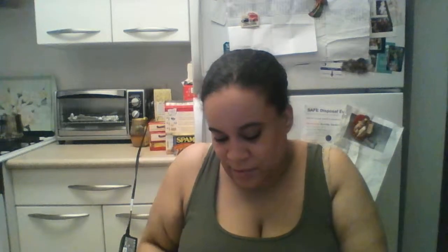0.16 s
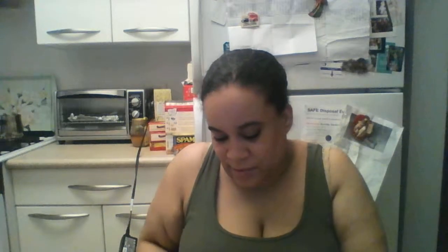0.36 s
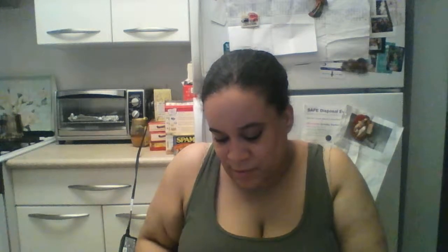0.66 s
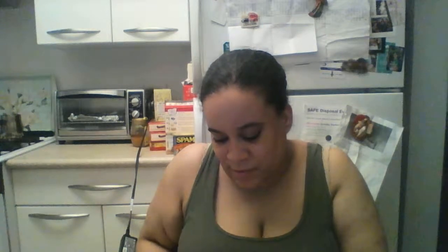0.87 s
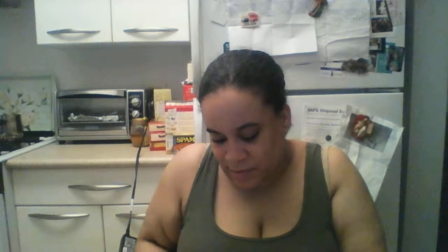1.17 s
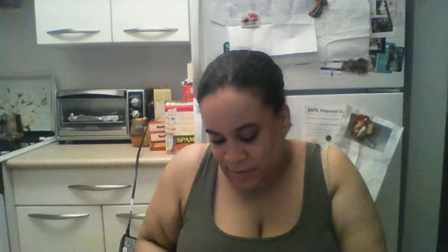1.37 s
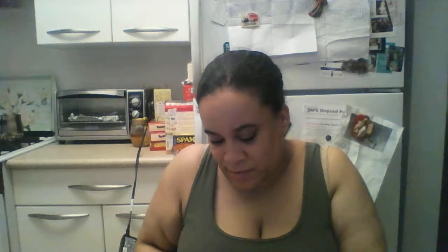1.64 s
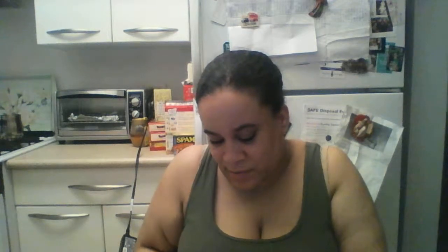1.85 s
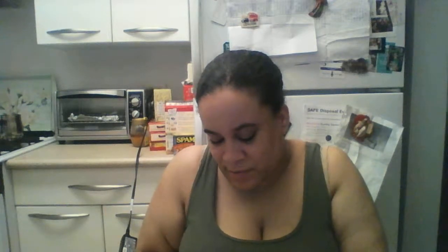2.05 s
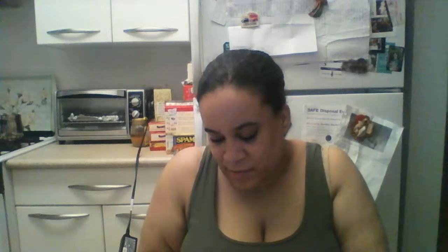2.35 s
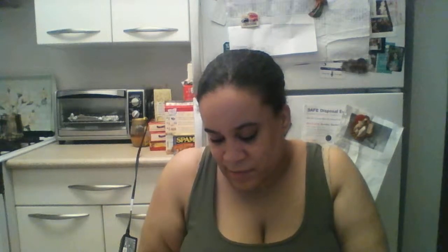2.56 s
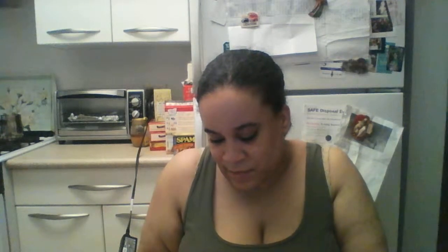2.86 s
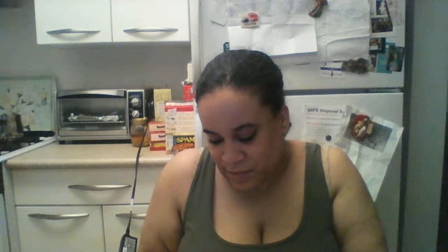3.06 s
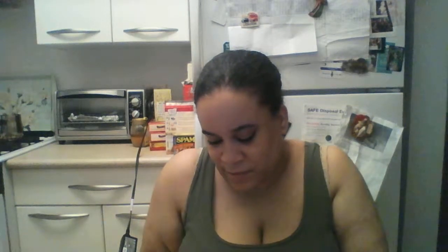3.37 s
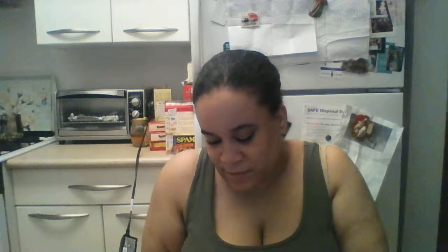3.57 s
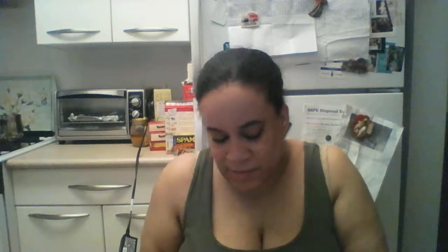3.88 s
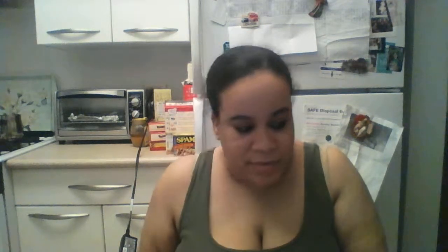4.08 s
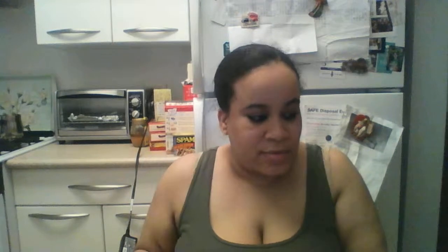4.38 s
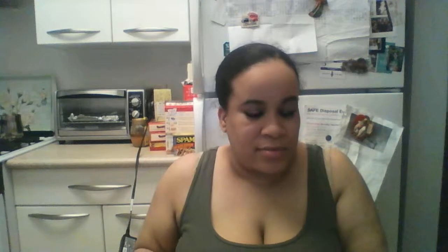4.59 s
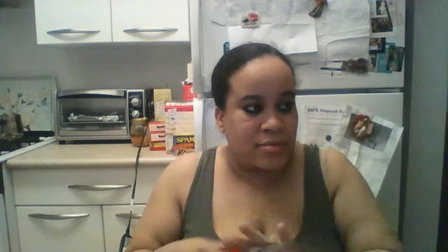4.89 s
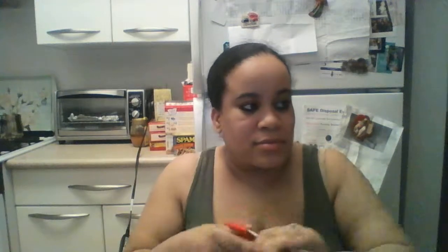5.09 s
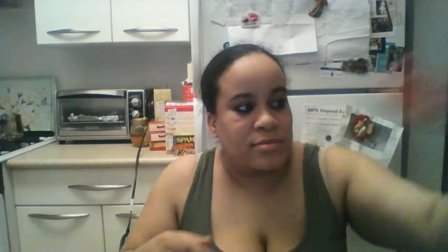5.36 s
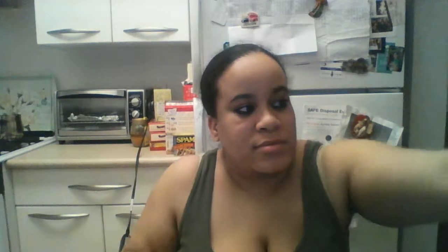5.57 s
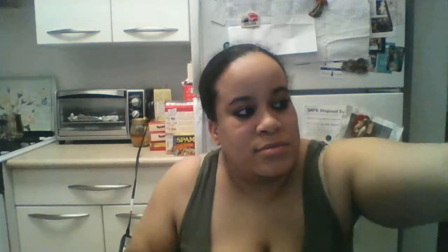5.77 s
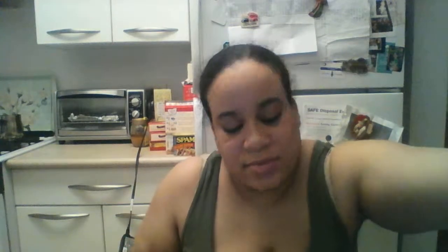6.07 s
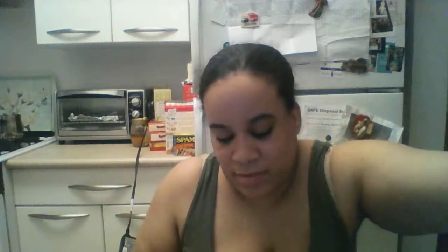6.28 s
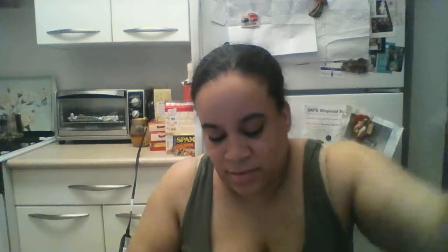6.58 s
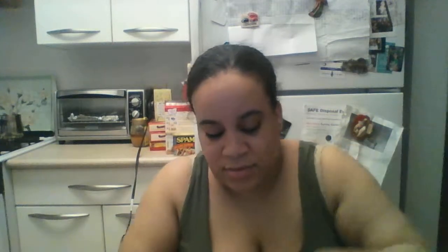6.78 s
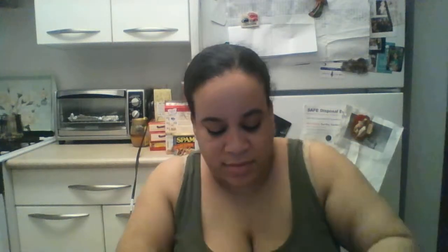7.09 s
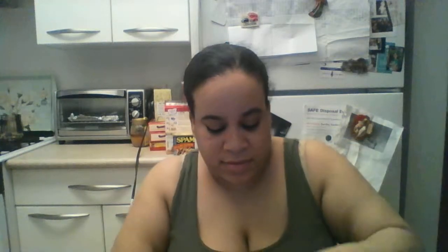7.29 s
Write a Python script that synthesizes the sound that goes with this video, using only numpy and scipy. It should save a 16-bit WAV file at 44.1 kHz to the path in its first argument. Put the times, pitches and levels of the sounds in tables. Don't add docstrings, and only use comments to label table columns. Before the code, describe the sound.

A small, hard-surfaced kitchen with a faint, steady appliance whir, heard through a narrow-band laptop microphone. From 0 to 1.3 s hands lightly rub cardboard, with a small knock and snap near 0.5 s. At 1.45 s a sharp double snap and short slice jump out, followed by soft papery scraping that swells around 2.0-2.2 s. Light hollow knocks come at 2.5-2.9 s, and a bright metallic scissor tick at 3.0 s. At 3.5 s a raspy slice and thud lead into the loudest crack at 3.65 s, with hard cutting and low table bumps. More slices, pulls and flap snaps run from 3.9 to 4.5 s, then it fades to near stillness. From 5.9 s there are table thumps, crackling tape and light scrapes; at 6.75 s a strong flap snap, then dense pops, rubbing and hollow knocks from 6.9 s to the end, about 7.4 s.

```python
import sys
import numpy as np
from scipy import signal
from scipy.fft import rfft, irfft, next_fast_len
from scipy.io import wavfile
from scipy.ndimage import uniform_filter1d

SR = 44100
rng = np.random.default_rng(int(sys.argv[2]) if len(sys.argv) > 2 else 0)


def transcribe(u):
    v = np.clip(np.atleast_2d(u).T, -1, 1)
    q = np.round(v * 32767).astype(np.int16)
    wavfile.write(sys.argv[1], SR, q)


def volts_from_decibels(level):
    exponent = np.asarray(level, float) / 20
    return 10 ** exponent


N = 328090


def evened(x):
    return x / np.sqrt(np.mean(x ** 2) + 1e-20)


def read(points, hz):
    f, value = np.transpose(points)
    return np.interp(np.log(hz + 1), np.log(f + 1), value)


def colour(x, points):
    size = next_fast_len(N)
    gain = volts_from_decibels(read(points, np.fft.rfftfreq(size, 1 / SR)))
    return irfft(rfft(x, size) * gain, size)[..., :N]


def resonate(x, hz, width):
    r = np.exp(-np.pi * width / SR)
    return signal.lfilter([1 - r, 0, r - 1], [1, -2 * r * np.cos(2 * np.pi * hz / SR), r * r], x)


def resonate_twice(x, hz, width):
    return resonate(resonate(x, hz, width), hz, width)


def wander(seconds, count=N):
    size = max(int(seconds * SR), 1)
    return evened(uniform_filter1d(uniform_filter1d(rng.standard_normal(count), size), size))


def slips(per_s, spread_db, clump_db):
    size = volts_from_decibels(spread_db * np.minimum(rng.exponential(1, N), 4) + clump_db * wander(0.005))
    return size * rng.choice([-1., 1.], N) * (rng.random(N) < per_s / SR)


def body(drive, modes, shift_db, shift_s):
    out = 0
    for hz, width, db in modes:
        touched = drive * volts_from_decibels(shift_db * wander(shift_s, len(drive)))
        out = out + volts_from_decibels(db) * evened(resonate_twice(touched, hz, 1.5 * width + hz / 50))
    return out / np.sqrt(uniform_filter1d(out ** 2, 2500) + 1e-9)


def pressure(rows, column, pace):
    t, rows = np.arange(0, N, 32) / SR, np.array(rows)
    rise, release = pace
    start, end = rows[:, :1], rows[:, :1] + abs(rows[:, 1:2])
    db = rows[:, column, None] - rise * np.maximum(start - t, 0) - release * np.maximum(t - end, 0)
    total = np.sqrt((volts_from_decibels(db) ** 2).sum(0))
    return uniform_filter1d(np.interp(np.arange(N) / SR, t, total), size=200)


def add(mix, s, sound):
    part = mix[round(s * SR):][:len(sound)]
    part += sound[:len(part)]


# pitch in Hz, level in dB per Hz.
WHIR_AIR = [(12, -22.5), (20, 6.5), (38, -14.5), (59, -32), (77, -4.5), (225, -1), (353, -6.5), (911, -11),
            (1060, -29.5), (1170, -5.5), (2600, -26), (6390, -28), (7800, -39.5), (10100, -78),
            (17200, -120)]
# pitch in Hz, width in Hz, level in dB.
MOTOR = [
    (87, 10, -77),
    (898, 72, -62),
    (1101.6, 26, -67),
]


def whir():
    a, b, patches = rng.standard_normal((N // 128 + 6, 257, 3)).T
    patches = evened(uniform_filter1d(uniform_filter1d(patches, 3, 0), 20, 1))
    air = signal.istft((a + 1j * b) * volts_from_decibels(2.2 * patches), nperseg=512, noverlap=384)[1][:N]
    out = volts_from_decibels(-56) * evened(colour(air, WHIR_AIR))
    for hz, width, db in MOTOR:
        line = evened(resonate(rng.standard_normal(N), hz, width))
        out = out + volts_from_decibels(db + 4.56 * wander(0.04)) * line
    return out


# pitch in Hz, time to fall by 60 dB in seconds.
ROOM = [(150, 0.43), (400, 0.14), (1000, 0.19), (3000, 0.19), (7000, 0.16)]
# pitch in Hz, level in dB.
ROOM_BASS = [(200, -5.5), (500, 1), (900, 1)]


def kitchen(x):
    taps = np.zeros((3, SR // 2))
    at = np.arange(200, SR // 2 - 20, 20)
    at_random = at + rng.integers(0, 20, (3, len(at)))
    np.put_along_axis(taps, at_random, rng.choice([-1., 1.], (3, len(at))), 1)
    hz, t, z = signal.stft(taps, SR, nperseg=256)
    tail = signal.istft(z * volts_from_decibels(-60 * t / read(ROOM, hz)[:, None]), SR, nperseg=256)[1]
    tail = tail / np.linalg.norm(tail[0])
    phase = 9 * np.arange(N) / SR + np.arange(3)[:, None] / 3
    turns = np.cos(2 * np.pi * phase) * np.sqrt(2 / 3)
    return colour(signal.fftconvolve(x * turns, tail, axes=1).sum(0)[:N], ROOM_BASS)


# pitch in Hz, width in Hz, level in dB.
TABLE_TOP = [(82, 43, 11.5), (107, 12, -8.5), (151.6, 330, -9)]
# full weight from this second, seconds held, level in dB.
PUSHES = [(0.57, 0.007, -48), (0.78, 0.4, -65), (1.45, 0.12, -53), (1.73, 0.078, -47), (2.18, 0.26, -57),
          (2.65, 0.037, -54.5), (3.52, 0.16, -50), (3.66, 0.033, -35.5), (4.31, 0.017, -32.5),
          (4.48, 0.012, -45), (5.36, 0.87, -63.5), (5.99, 0.1, -32), (6.35, 0.069, -46.5), (7.41, .03, -52)]


def table():
    top = body(slips(150, 0.87, 3.7), TABLE_TOP, shift_db=16.5, shift_s=0.18)
    return pressure(PUSHES, 2, pace=(1100, 200)) * top


# start in seconds, peak in dB, pitch in Hz.
TICKS = [
    (2.8587, -41.5, 6230),
    (2.988, -21.5, 6430),
]


def ticks():
    out, t = np.zeros(N), np.arange(5000) / SR
    for s, db, hz in TICKS:
        hiss = evened(resonate_twice(rng.standard_normal(5000), hz, 1000))
        tones = np.sin(2 * np.pi * hz * t) + .2 * np.sin(2 * np.pi * .8 * hz * t)
        tick = t / .0006 * np.exp(1 - t / .0006) * tones
        add(out, s, volts_from_decibels(db) * (tick + .16 * hiss * np.exp(-t / .025)))
    return out


# pitch in Hz, width in Hz, level in dB.
PANELS = [(240, 11.7, -3.5), (323.2, 37.6, -2.5), (393, 33, -1), (608, 65, -21.5), (658, 81, -5.5),
          (511, 91, -12), (772, 96, -19)]
# start in seconds, peak in dB, pitch in Hz, seconds to fall by 60 dB.
KNOCKS = [(0.552, -23, 407, 0.058), (1.46, -12, 760, 0.029), (1.713, -28.5, 397, 0.062),
          (2.164, -21, 299, 0.14), (2.483, -34.5, 232, 0.19), (2.484, -37.5, 399, 0.28),
          (2.671, -20, 399, 0.11), (2.768, -18.5, 392, 0.02), (2.935, -23, 246, 0.25),
          (2.997, -21.5, 404, 0.098), (3.279, -36.5, 439.4, 0.072), (3.296, -30, 419, 0.36),
          (3.338, -25.5, 404.4, 0.19), (3.484, -1.5, 363, 0.036), (3.561, -11.5, 249, 0.14),
          (3.604, -11, 236.4, 0.086), (3.66, -15.5, 240, 0.086), (3.674, -12, 240, 0.03),
          (3.655, -18.5, 572, .06), (3.709, -2.5, 338, 0.039), (3.71, -13, 543, .06),
          (3.903, -30.5, 374, 0.085), (4.113, -23, 337, 0.14), (4.156, -18.5, 393, 0.084),
          (4.299, -22.5, 390, 0.12), (4.375, -26, 713, 0.11), (4.452, -16.5, 354, 0.054),
          (4.454, -34, 640, 0.059), (4.631, -38.5, 212, 0.94), (4.795, -39, 192, 0.25),
          (5.935, -26, 296, 0.084), (5.988, -14, 211, 0.016), (6.327, -25.5, 240, 0.064),
          (6.354, -21, 340, 0.039), (6.377, -21, 285, 0.088), (6.436, -27, 89.4, 0.43),
          (6.748, -9.5, 410, 0.026), (6.751, -19.5, 513, 0.15), (6.765, -15.5, 413, 0.074),
          (6.887, -12.5, 244, 0.12), (6.8893, -11.5, 431, 0.11), (6.995, -18.5, 425, 0.2),
          (7.074, -19.5, 393, 0.22), (7.111, -23, 370, 0.13), (7.149, -15, 407, 0.34),
          (7.259, -23, 444, 0.15), (7.295, -21, 238, 0.46), (7.312, -25.5, 545, 0.16),
          (7.377, -21, 302, 0.083)]


def knocks():
    out, t = np.zeros(N), np.arange(9000) / SR
    rise = 1 - np.exp(-t / .0016)
    for s, db, hz, t60 in KNOCKS:
        a, b = rng.random(2)
        fall = volts_from_decibels(-60 * t / max(t60, .01)) + 0.26 * np.exp(-t / 0.0066)
        twin = .25 * np.sin(2 * np.pi * hz * (1.12 + .15 * a) * t)
        near = fall * (np.sin(2 * np.pi * hz * t) + twin)
        box = np.zeros(len(t))
        for f, width, level in PANELS:
            box += volts_from_decibels(level - 24 * width * t) * np.sin(2 * np.pi * f * (1 + .04 * (a - b)) * t)
        add(out, s, volts_from_decibels(db - 5.0) * (near + 0.26 * (hz < 500) * box) * rise)
    return out


# start in seconds, peak in
# dB, pitch in Hz, seconds to fall by 60 dB.
SNAPS = [(0.4815, -23.5, 1320, 0.024), (0.536, -19.5, 1500, 0.02), (0.536, -22, 2450, 0.014),
         (0.536, -30, 3600, 0.01), (0.904, -31, 1610, 0.11), (1.2886, -28.5, 1286, 0.066),
         (1.4323, -11.5, 1560, 0.019), (1.433, -18, 3700, .012), (1.4332, -21, 6140, .012),
         (1.4355, -3.5, 707, 0.0099), (1.4454, 5.5, 1500, 0.0066), (1.4445, -4.5, 3680, 0.0045),
         (1.4454, -17, 6300, .012), (1.4455, -9, 750, 0.011), (1.6911, -38, 860, 0.095),
         (1.7215, -20, 3456, 0.028), (2.1794, -38, 1440, 0.034), (2.581, -29, 880, 0.11),
         (2.588, -26.5, 1200, 0.035), (2.672, -25.5, 1326, 0.073), (3.277, -26.5, 727, 0.1),
         (3.3903, -25.5, 1410, 0.046), (3.6502, 14, 2530, 0.0058), (3.6505, -1.5, 695, 0.066),
         (3.671, -9.5, 712, .04), (3.682, -4, 2064, 0.0293), (3.695, -4.5, 2000, .025),
         (3.709, -6.5, 792, .04), (3.889, -28, 1474, 0.1), (3.956, -13.5, 2700, 0.046),
         (3.9673, 0.5, 1700, 0.022), (4.0067, -3.5, 1380, 0.04), (4.0068, -11.5, 2750, 0.057),
         (4.042, -14, 2670, .03), (4.128, -10, 1460, 0.036), (4.3, -12, 1354, 0.047),
         (4.305, -11, 2500, 0.03), (4.3432, -9, 1690, .02), (4.4343, -8, 996, 0.051),
         (4.4517, -1.5, 1370, 0.025),
         (5.3905, -23, 1280, 0.014), (5.913, -28.5, 1130, 0.037), (6.0819, -19.5, 1063, 0.11),
          (6.092, -14.5, 680, 0.052), (6.098, -13, 1990, 0.041), (6.233, -14.5, 1823, 0.074),
          (6.25, -15, 705, 0.036), (6.589, -17.5, 1270, 0.022), (6.689, -19.5, 1380, 0.029),
          (6.746, -2.5, 1370, 0.028), (6.7646, 4, 1379, 0.034), (6.768, -13.5, 2010, 0.045),
          (6.9288, -8, 1370, 0.049), (6.931, -9.5, 3040, 0.027), (7.061, -22, 710, .08),
          (7.1106, 6, 1554, 0.025), (7.115, 6.5, 1001, 0.077), (7.132, 5, 1335, 0.021),
          (7.154, 3, 1370, 0.021), (7.179, -2, 1480, 0.023), (7.192, -3.5, 1570, 0.026),
          (7.281, -9, 1282, 0.09), (7.2965, -0.5, 707, 0.029)]
# start in seconds, peak in dB, pitch in Hz.
CRACKLES = [(4.557, -34, 4200), (6.0125, -26, 5600), (6.014, -26.5, 4320), (6.038, -25, 5000),
            (6.079, -23, 6230), (6.081, -23.5, 4700), (6.227, -20.5, 6230), (6.247, -19, 5640),
            (6.281, -23, 5530), (6.32, -24, 5100), (6.377, -31, 6400), (6.385, -19.5, 3000),
            (6.489, -40.5, 5600), (7.016, -34, 5600), (7.107, -25, 4500)]


def snaps():
    out, t = np.zeros(N), np.arange(3000) / SR
    late = t - .0005
    edge = np.sin(2 * np.pi * 5000 * late) * np.exp(-(late / .0002) ** 2)
    for s, db, hz, t60 in SNAPS:
        swell = (1 - np.exp(-t / (.05 * t60))) ** 2
        fall = volts_from_decibels(-60 * t / max(t60, .004)) * swell
        rough = evened(resonate_twice(rng.standard_normal(3000), hz * 1.15, hz * .45))
        ring = np.sin(2 * np.pi * hz * t) + .4 * rough
        add(out, s, volts_from_decibels(db - 9.0) * ring * fall + volts_from_decibels(db - 39) * edge)
    for s, db, hz in CRACKLES:
        grain = evened(resonate_twice(rng.standard_normal(3000), hz, 1500))
        add(out, s, volts_from_decibels(db - 11) * grain * t / .0013 * np.exp(1 - t / .0013))
    return out


# start in seconds, peak in dB.
POPS = [
    (.5365, -33),
    (1.4338, -28),
    (1.4446, -25),
    (3.4835, -17),
    (3.6494, 4),
    (4.4515, -21),
    (6.7468, -22),
    (7.1095, -20),
]


def pops():
    out, hush, t = np.zeros(N), np.ones(N), np.arange(400) / SR
    wide = signal.butter(2, [1000, 6000], "bandpass", fs=SR)
    for s, db in POPS:
        burst = (.5 * rng.standard_normal(400) + 6 * (t == 0)) * np.exp(-t / .0009)
        crack = signal.lfilter(*wide, burst)
        add(out, s, volts_from_decibels(db) * crack / abs(crack).max())
        hush[round(s * SR) - 900:round(s * SR)] *= volts_from_decibels(np.linspace(0, -14, 900))
    return out, hush


# pitch in Hz, width in Hz, level in dB.
FLAPS = [(996, 33, 5.5), (1370, 450, 12.5), (1480, 520, -5.5), (1715, 59, 2), (1829, 220, -4),
         (2040, 300, 3.5), (2360, 370, -25), (2880, 150, -21.5)]
RESTING = [(838, 26, -8), (1064, 20, -3), (1437, 37, -12.5), (2080, 16, -18), (3340, 14, -19)]
NUDGED = [(1500, 98, 0), (2370, 71, -10.5), (2670, 15, -16), (3700, 120, -27), (4730, 42, -19)]
PINCHED = [(954, 38, -3), (1560, 21, 5.5), (2540, 130, -7), (3500, 180, 3.5), (6140, 32, -2)]
TAPPED = [(783, 57, 0), (1730, 43, -11), (2180, 49, -16.5), (2670, 67, -23), (3240, 150, -18)]
DRAGGED = [(1350, 80, -0.5), (1801, 24, -10.5), (2100, 270, -12.5), (2465, 34, -15.5), (2930, 250, -24),
           (3555, 28, -15)]
SCORED = [(880, 28, 4.5), (1440, 53, 9.5), (2040, 45, 5), (2420, 130, -2.5), (2580, 30, -4), (2870, 25, -1),
          (3460, 29, -4.5), (4050, 38, -15)]
SLIT = [(1437, 120, -2), (2000, 60, -5), (2710, 120, -16)]
BENT = [(1380, 98, 25), (2750, 40, 12), (3660, 85, 9), (4600, 81, 3)]
STRUCK = [(832, 72, 2), (1570, 98, -16), (2414, 42, -2), (3280, 59, -26), (4070, 36, -21),
          (5600, 93, -12.5), (6190, 30, -26), (6840, 35, -20)]
PULLED = [(1370, 48, 0.5), (1595, 28, -2.5), (2260, 140, -7), (2693, 77, 1), (3220, 35, -24),
          (4750, 57, -9.5), (5360, 130, -10.5)]
TORN = [(596, 28, -5.5), (860, 56, -10.5), (1440, 140, 0), (1750, 130, -3.5), (2036, 31, -6),
        (3410, 60, -19), (4530, 64, -21), (5260, 92, -21)]
LIFTED = [(1380, 32, 0.5), (1630, 56, 2.5), (1771, 24.4, 1.5), (2414, 54, -4), (4040, 33, -33),
          (5000, 35, -32)]
FOLDED = [(700, 150, -3), (1030, 120, 6), (1370, 97, 1.5), (1780, 22, 0), (3100, 68, -25),
          (4870, 27, -10.0), (5500, 37, -26)]
SLAPPED = [(1380, 120, 2.5), (1920, 60, -11), (2550, 84, -8), (2900, 28, -14), (3540, 88, -9),
           (4700, 28, -12), (5200, 35, -8), (6260, 36, -31)]
SPREAD = [(698, 29, -8), (1270, 300, 3), (1700, 78, -1.5), (2000, 93, -2.5), (2175, 23, -10),
          (2370, 32, -20), (3000, 55, -19.5), (3400, 32, -26)]
# start in seconds, share of blur, the ringing set free.
HOLDS = [(0, 0.23, RESTING), (.4, 0.36, NUDGED), (.8, 0.35, PINCHED), (1.2, 0.67, STRUCK),
         (1.621, 0.34, TAPPED), (1.8, 0.54, DRAGGED), (2.4, 0.18, RESTING), (2.659, 0.11, SCORED),
         (3.099, 2.1, FLAPS), (3.84, 0.83, SLIT), (3.94, 0.79, PULLED), (4.052, 0.72, TORN),
         (4.221, 0.5, LIFTED), (4.323, 1.5, FLAPS), (4.434, 0.83, FOLDED), (5, 0.66, FLAPS),
         (6.55, 0.3, BENT), (6.743, 0.29, SLAPPED), (6.87, 0.7, SPREAD), (7.101, 0.91, FLAPS)]
# pitch in Hz, level in dB.
BLUR = [(700, -48), (1150, -4.5), (1500, 1.5), (2800, -2.5), (3600, -12), (5000, -52.5)]


def flaps():
    drive, out = slips(6000, 2.2, 1.3), np.zeros(N)
    blur = colour(drive, BLUR)
    ends = [row[0] for row in HOLDS[1:]] + [N / SR]
    for (s, share, modes), end in zip(HOLDS, ends):
        span = slice(round(s * SR), round(end * SR))
        ring = body(drive[span], modes, shift_db=2.2, shift_s=.015)
        add(out, s, evened(ring + share * evened(blur[span])))
    return out


def streaky(x, streak_db, patch_db):
    hz, t, z = signal.stft(x, SR, nperseg=512)
    fine, wide = rng.standard_normal((len(t), len(hz), 2)).T
    fine = evened(uniform_filter1d(fine, size=9, axis=1))
    wide = evened(uniform_filter1d(uniform_filter1d(wide, size=14, axis=1), size=8, axis=0))
    gain = evened(volts_from_decibels(streak_db * fine + patch_db * wide))
    return signal.istft(z * np.where(hz[:, None] > 1900, gain, 1), SR, nperseg=512)[1][:N]


# pitch in Hz, level in dB per Hz.
FIZZ = [(1470, -19), (2500, -3), (2900, -6.5), (3630, -11), (4170, -9), (6580, -10.5), (6890, -15),
        (7600, -19.5), (9880, -53.5), (16700, -120)]
# full pressure from this second, seconds held,
# then the levels in dB of scraped flaps, hollow panels, and tape and paper fizz.
FIDGETS = [(0.0, 0.004, -44.5, -55, -71), (0.07, 0.12, -43.5, -53.5, -59), (0.24, 0.16, -60, -62, -65),
           (0.49, 0.065, -50, -57.5, -60), (0.57, 0.025, -40, -45, -59), (0.85, 0.0091, -67, -77, -64),
           (0.904, 0.0076, -41.5, -57.5, -54), (1.72, .004, -37, -53, -51), (1.692, .01, -48, -66, -72),
           (1.85, 0.14, -48, -52.5, -58), (1.98, 0.28, -42, -49, -56.5), (2.155, 0.035, -29.5, -39.5, -39),
           (2.25, 0.1, -57, -56.5, -76), (2.45, 0.11, -78, -68, -84), (2.67, 0.0068, -56, -54, -62),
           (2.75, 0.11, -46.5, -58.5, -62), (2.86, 0.11, -46.5, -56, -61), (3.19, 0.028, -50, -52.5, -61.5),
           (3.27, 0.063, -60.5, -53, -83), (3.39, 0.04, -65, -57, -83)]
CUTS = [
    (3.656, 0.0075, -17, -20.5, -20.5),
    (3.685, 0.02, -23, -29, -21),
    (3.76, 0.0044, -48, -46.5, -35.5),
    (4.268, 0.068, -29, -49, -62),
    (4.302, 0.13, -26.5, -43.5, -31),
    (4.445, 0.031, -24, -36, -32),
    (4.57, 0.057, -50.5, -61.5, -62),
    (4.72, 0.12, -80, -77, -88),
]
OPENING = [(5.934, 0.074, -44.5, -50.5, -54.5), (6.03, 0.017, -54, -54, -44),
           (6.092, 0.0032, -31, -46.5, -40), (6.225, 0.046, -37, -59.5, -35),
           (6.335, 0.056, -40, -47.5, -39.5), (6.596, 0.0014, -58.5, -60, -98),
           (6.71, 0.086, -43, -50.5, -45), (6.905, 0.0092, -36, -39, -43.5),
           (6.94, 0.23, -28.5, -33.5, -32.5), (7.10, 0.012, -16, -34.5, -26.5),
           (7.17, 0.051, -27, -41, -34), (7.225, .04, -34, -47.5, -42), (7.278, 0.046, -25.5, -33, -29.5),
           (7.36, .1, -33.5, -39.5, -31.5)]
SLICES = [
    (1.455, 0.013, -26.5, -36, -51),
    (3.486, 0.087, -27, -31.5, -32),
    (3.56, 0.049, -28.5, -38, -33),
    (3.892, 0.069, -32.5, -54.5, -39.5),
    (3.962, 0.091, -22, -41, -35.5),
    (4.06, 0.085, -20, -36, -44),
    (6.752, 0.026, -24, -40, -34),
]
# pitch in Hz, level in dB.
HELD_PANEL = [(260, -7.5), (380, -1)]


def rubbing():
    panels = body(slips(500, 3.5, 3.1), PANELS, shift_db=3.2, shift_s=.02)
    fizz = evened(colour(slips(8000, 2.5, 2.2), FIZZ))
    hands = [(FIDGETS, (320, 280)), (CUTS, (483, 680)), (OPENING, (450, 213))]
    on_flaps, on_panels, on_tape = (sum(pressure(rows, k, pace) for rows, pace in hands) for k in (2, 3, 4))
    cut_flaps, cut_panels, cut_tape = (pressure(SLICES, k, (830, 1260)) for k in (2, 3, 4))
    hollow = on_panels * panels + cut_panels * colour(panels, HELD_PANEL)
    scraped = (on_flaps + cut_flaps) * flaps()
    papery = (on_tape + cut_tape) * fizz
    return volts_from_decibels(5.5) * hollow + volts_from_decibels(-5.5) * scraped + volts_from_decibels(-5.5) * papery


# pitch in Hz, level in dB.
BASS_CUT = [(30, -26), (62, -27.5), (85, -0.5)]


def scene():
    cracks, hush = pops()
    hits = knocks() + snaps() + cracks
    rub = hush * streaky(rubbing(), streak_db=3.5, patch_db=-0.14)
    steel = ticks()
    room = kitchen(volts_from_decibels(-5.0) * hits + volts_from_decibels(-3.5) * rub + volts_from_decibels(-7.0) * steel)
    box = hits + rub + steel + room + table()
    return (colour(box, BASS_CUT) + whir())[None]


# start in seconds, length in seconds, lowest Hz, highest Hz.
STARVED = [(.516, .016, 4250, 5000), (1.449, .024, 4450, 5100), (1.922, .012, 3000, 4600),
           (6.761, .016, 3750, 4550), (6.761, .014, 5350, 6000), (6.761, .016, 2950, 3400),
           (6.889, .013, 3750, 5300), (6.889, .014, 5900, 6900), (6.98, .012, 3250, 4100)]


def thrifty(x, patchy_db, holes):
    hz, t, z = signal.stft(x, SR, nperseg=256)
    band, block = (hz // 520).astype(int), (t / .032).astype(int)
    shape = (band[-1] + 1, block[-1] + 1)
    jitter, luck = rng.standard_normal(shape), rng.random(shape)
    gain = volts_from_decibels(patchy_db * jitter - 25 * (luck < holes))[band][:, block]
    for s, length, low_hz, high_hz in STARVED:
        silent = np.outer((hz > low_hz) & (hz < high_hz), (t > s) & (t < s + length))
        gain = gain * np.where(silent, volts_from_decibels(-35), 1)
    return signal.istft(z * np.where(hz[:, None] > 1800, gain, 1), SR, nperseg=256)[1][:, :N]


def low_pass(x):
    return signal.sosfilt(signal.butter(12, 15750, fs=SR, output="sos"), x)


# pitch in Hz, level in dB.
EDGE = [(7000, -0.5), (7400, -9.5), (7800, -20), (8100, -39.5), (8400, -65)]


def record(dry):
    narrow = colour(thrifty(np.clip(dry, -1.25, 1.25), patchy_db=0.86, holes=0.0066), EDGE)
    flipped = narrow * np.cos(2 * np.pi * 16000 * np.arange(N) / SR)
    mirror = colour(flipped, [(8000, -49.0), (13000, -56.0), (15600, -55.5), (16000, -100)])
    hiss = volts_from_decibels(-99) * rng.standard_normal(dry.shape)
    bend = .25
    return low_pass(np.tanh(bend * narrow) / bend + mirror + hiss)


dry = scene()
out = record(dry)
transcribe(out)
```